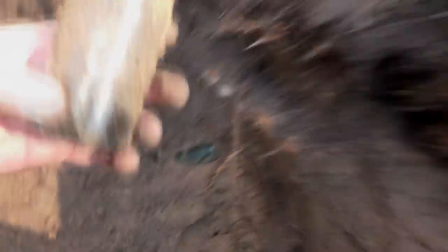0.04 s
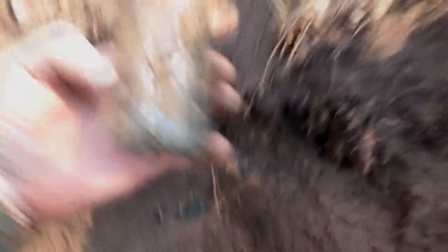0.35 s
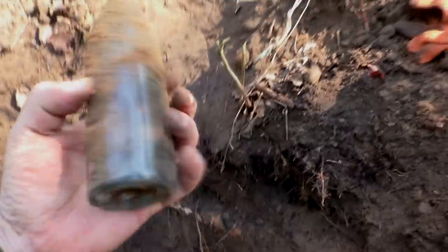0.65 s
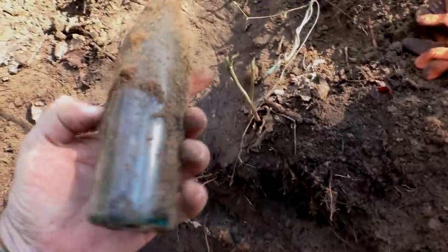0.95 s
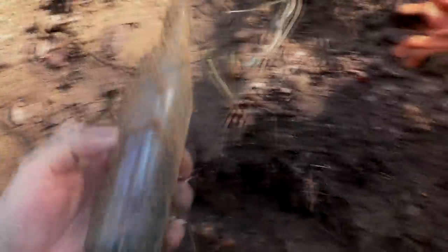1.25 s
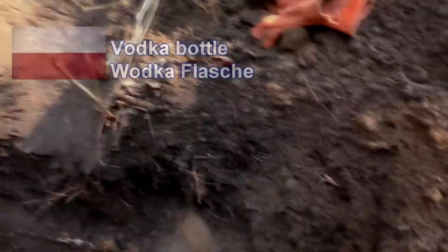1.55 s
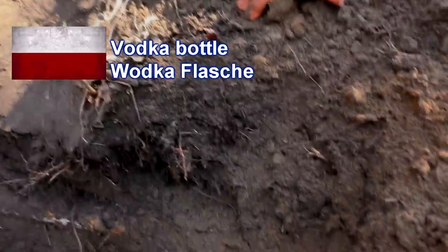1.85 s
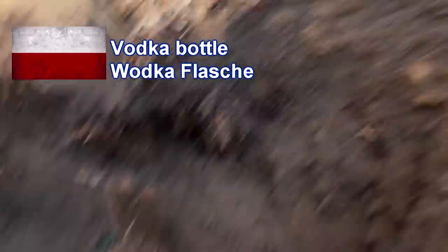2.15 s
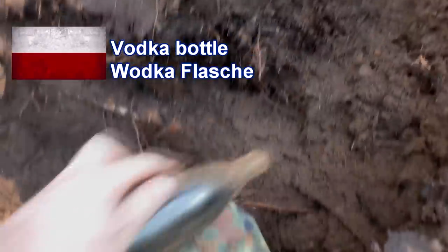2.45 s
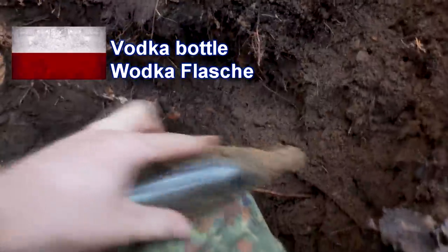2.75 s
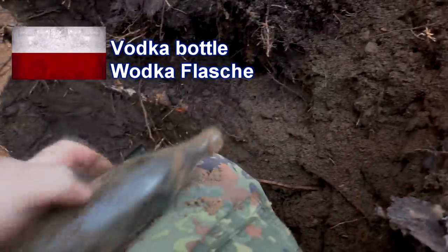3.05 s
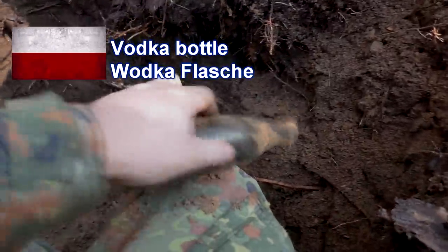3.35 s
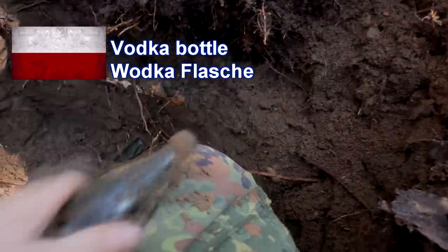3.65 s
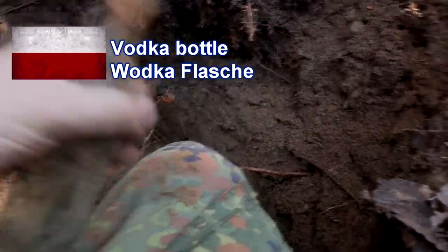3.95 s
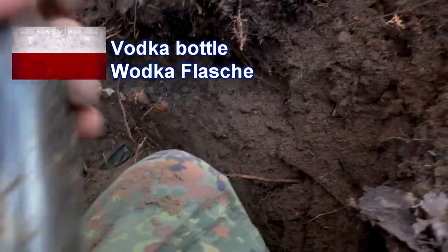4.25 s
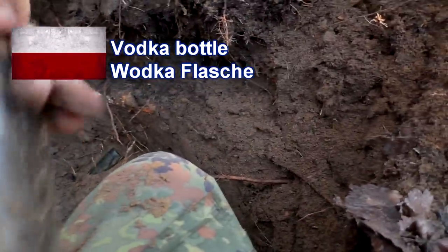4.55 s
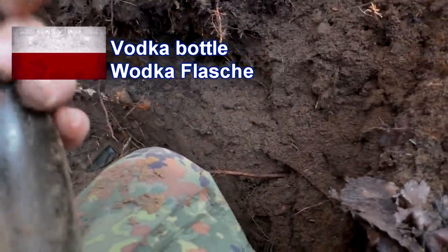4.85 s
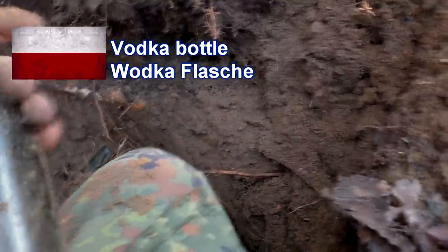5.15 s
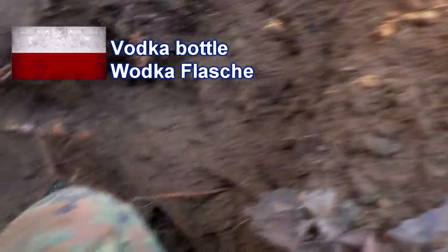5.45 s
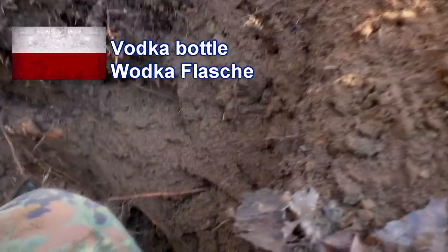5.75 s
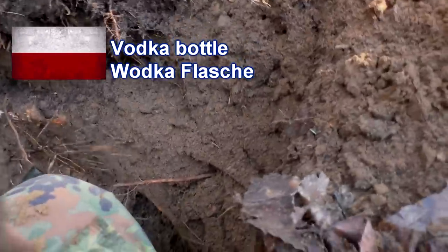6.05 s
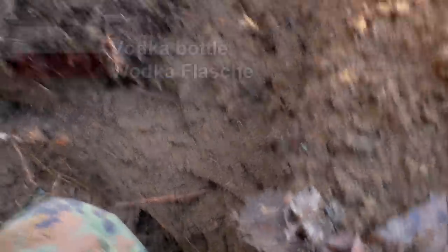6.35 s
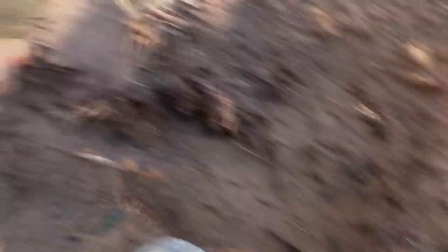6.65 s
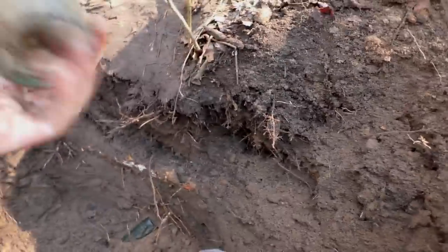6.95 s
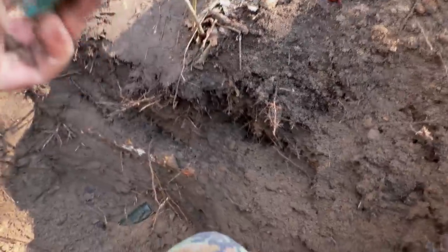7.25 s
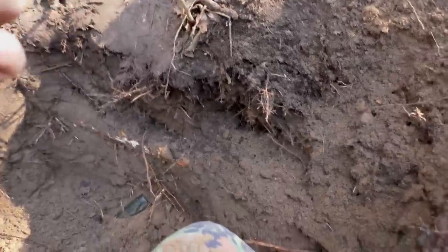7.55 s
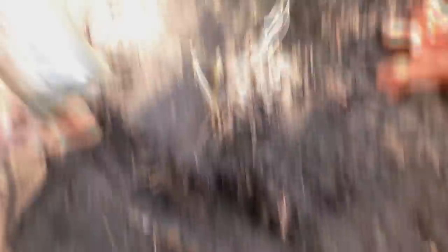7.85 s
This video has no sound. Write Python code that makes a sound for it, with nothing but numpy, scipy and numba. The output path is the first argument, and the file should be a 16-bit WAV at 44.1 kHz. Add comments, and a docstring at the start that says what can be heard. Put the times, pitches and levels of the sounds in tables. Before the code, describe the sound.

Close to the microphone, hands turn a dirt-crusted glass bottle and crack grit off it with tiny ticks. The bottle is wiped on a trouser knee in quick hissing, rasping strokes, then fingers rub off more soil, making the glass ring faintly. Soft hand bumps and a rustling sleeve go with the work. Behind, in a hushed wood, small birds whistle and a distant crow caws once.

```python
"""Cleaning a dug-up bottle

Close by, hands turn a glass bottle, crack off grit, wipe it on a trouser knee and rub off the soil.
Slipping grains hiss, rasp and ring the glass; hands bump it and a sleeve rustles.
Behind, in the hush of a wood, small birds whistle and a distant crow caws once."""
import sys
import numpy as np
from scipy import signal
from scipy.fft import rfft, irfft, next_fast_len
from scipy.io import wavfile
from scipy.ndimage import map_coordinates
from numba import njit

SR = 44100
rng = np.random.default_rng(int(sys.argv[2]) if len(sys.argv) > 2 else 0)


def persist_wave(psi):
    """Save psi, clipped to +-1, as 16-bit WAV."""
    counts = np.round(np.clip(psi, -1, 1) * 32767).astype(np.int16)
    wavfile.write(sys.argv[1], SR, np.atleast_2d(counts).T)


N = 353505

# strokes on the knee: start_s, length_s, fastest_frac, arch_db, cloth_hiss_db, palm_hiss_db, rasp_db
KNEE_WIPES = [(1.704, 0.35, 0.72, 7.5, -36.5, -23.5, -31), (2.118, 0.36, 0.82, 3.5, -30.5, -29.5, -30),
              (2.443, 0.25, 0.2, 6, -25.5, -29.5, -28), (2.746, 0.37, 0.52, 8.5, -21.5, -25, -28),
              (3.077, 0.34, 0.47, 9.5, -22.5, -30, -25.5), (3.419, 0.29, 0.55, 8, -22.5, -23.5, -27),
              (3.696, 0.27, 0.29, 20, -25.5, -24.5, -26.5), (3.956, 0.1, 0.15, 12, -31, -28, -32.5)]
# finger strokes on the glass: start_s, length_s, fastest_frac, hiss_db, rasp_db, ring_db
FINGER_RUBS = [(-.05, 0.37, 0.55, -43.5, -43.5, -65), (0.257, 0.28, 0.37, -39, -43.5, -42.5),
               (0.5, 0.1, 0.17, -35, -44, -31), (0.564, 0.26, 0.17, -47, -46.5, -43.5),
               (1.11, 0.36, 0.2, -50, -67, -48), (3.886, 0.12, 0.16, -30.5, -58, -30),
               (4.006, 0.22, 0.42, -32.5, -47, -53), (4.212, 0.19, 0.5, -26.5, -38.5, -39),
               (4.391, 0.27, 0.38, -30, -40, -47), (4.617, 0.16, 0.53, -36, -48.5, -65),
               (4.721, 0.16, 0.57, -33.5, -38, -48), (4.86, 0.28, 0.27, -37, -42, -58),
               (5.095, 0.12, 0.36, -38, -58, -37), (5.191, 0.33, 0.35, -36.5, -44, -43.5),
               (5.49, 0.22, 0.95, -38, -42.5, -48), (5.7, 0.14, 0.67, -29.5, -38, -37),
               (5.85, 0.18, 0.47, -22.5, -35, -34), (5.992, 0.16, 0.6, -25.5, -32, -66),
               (6.139, .16, 0.66, -28.5, -36.5, -40), (6.277, 0.19, 0.67, -40.5, -41.5, -53),
               (6.415, 0.24, 0.56, -31, -43.5, -43), (6.616, 0.18, 0.28, -38.5, -44.5, -52),
               (6.874, 0.12, 1, -35.5, -52, -49), (6.974, 0.23, 0.1, -39.5, -78, -46),
               (7.226, 0.16, 0.3, -37, -50.5, -54), (7.361, 0.23, 0.93, -38, -46.5, -51),
               (7.57, 0.15, 0, -38, -54, -49), (7.724, 0.33, 0.41, -40, -49.5, -43.5)]
# soil on cloth: freq_hz, level_db
CLOTH_SPECTRUM = [(4000, -53.5), (6800, -18), (8200, 1), (10300, 5), (12900, -7), (14200, -7),
                  (16000, -18.5)]
# soil under skin: freq_hz, level_db
FINGER_SPECTRUM = [(4500, -31), (6700, -11), (7600, -5), (8800, -8), (10200, -2.5), (11000, -3.5),
                   (11600, 0.5), (12700, -5), (13800, -2), (16000, -8.5)]
# slips through hand and bottle: freq_hz, level_db
RASP_SPECTRUM = [(30, -34), (200, -9.5), (380, -8), (750, -27), (1100, -6.5), (2000, -1), (3200, 5),
                 (3900, 4.5), (4700, 3.5), (6500, -1.5), (9000, -25)]
# cavity between hand and bottle, lower as the grip closes: time_s, resonance_hz, level_db
GRIP_HOLLOW = [(1.9, 2570, -15), (2.2, 2260, -3.5), (2.6, 3470, -24), (2.83, 2930, 3.5), (3.1, 3150, -36),
               (3.28, 2690, -3), (3.37, 1850, 6), (3.451, 3560, -18), (3.6, 2730, -6), (3.82, 2010, -2),
               (4, 2000, 3.5), (4.3, 1970, -21), (6.1, 1960, -4.5)]
# hand-damped bottle: freq_hz, width_hz, level_db
GLASS_MODES = [(3240, 80, 5.5), (4600, 130, -5), (7620, 220, -9)]
# grains cracking: start_s, ring_db, snap_db
GRIT_CRACKS = [(0.759, -28, -29), (0.7916, -12, -8.5), (0.8104, -21, -18), (.829, -15, -17),
               (0.951, -23, -20.5), (1.078, -18.5, -20), (1.2116, -30, -28), (1.227, -17.5, -16),
               (2.396, -21, -19), (2.933, -24, -12), (5.291, -40, -22), (5.32, -44, -20)]
# crusted glass: freq_hz, width_hz, level_db
CRUST_MODES = [(3180, 180, -0.5), (4260, 200, -7.5)]
# snapping grain: freq_hz, width_hz, level_db
SNAP_MODES = [(7380, 400, 0), (9940, 1800, -6)]
# crust under a finger: start_s, length_s, level_db, rasp_re_hiss_db
CRUST_SCRATCHES = [(0.53, 0.013, -19.5, -32), (0.547, 0.017, -27, -11), (1.681, 0.031, -28, 1.5),
                   (3.636, 0.027, -22, -13), (6.403, 0.026, -29.5, -5)]
# hand meeting bottle: start_s, peak_db, pitch_hz
HAND_BUMPS = [(0.164, -23.5, 410), (.343, -32, 376), (2.374, -28.5, 370), (2.665, -35.5, 380),
              (3.39, -28.5, 467), (3.391, -19, 1410), (3.655, -19, 368), (3.659, -30, 111),
              (6.248, -31, 255), (6.353, -25.5, 1290)]
# arm movements: start_s, length_s, fastest_frac, level_db
ARM_SHIFTS = [(-.1, 0.88, 0.28, -42), (1.23, 0.31, 0.34, -45.5), (2.319, 0.13, 0.65, -39.5),
              (3.205, 0.12, 0.3, -33), (3.576, 0.37, 0.63, -38.5), (5.22, 0.86, 0, -52),
              (6.052, 0.268, 0.8, -39.5), (6.586, 0.35, .25, -50), (7.73, 0.41, 0.33, -49.5)]
# sleeve and hands: freq_hz, level_db
RUSTLE_SPECTRUM = [(25, -21), (130, -6.5), (380, 2.5), (560, -4.5), (800, -6.5), (1200, 1), (2200, -3.5),
                   (9000, -28)]
# single bird notes: start_s, length_s, start_hz, end_hz, level_db
BIRD_CHIRPS = [(0.646, 0.089, 2190, 3370, -38.5), (.682, 0.04, 3770, 3920, -34),
               (0.858, 0.03, 3130, 3690, -33), (0.883, 0.12, 5250, 4700, -46),
               (0.987, 0.042, 3680, 2830, -39), (1.027, 0.0394, 3220, 3600, -33),
               (1.091, 0.16, 7270, 6840, -53), (4.676, 0.04, 5420, 5250, -33),
               (5.262, 0.05, 5400, 4830, -45), (5.373, .028, 5000, 4300, -41),
               (6.243, 0.085, 3310, 2390, -35.5), (7.25, 0.21, 1646, 1470, -52.5),
               (7.441, 0.14, 2460, 2262, -40.5), (7.635, 0.077, 3340, 2320, -34.5)]
# runs of falling notes: start_s, stop_s, spacing_s, start_hz, end_hz, first_db, step_db
BIRD_TRILLS = [(1.11, 1.6, .09, 3300, 2260, -39, -1), (6.169, 6.55, 0.11, 4150, 3110, -40.5, -0.2)]
# crow call: time_s, pitch_hz, level_db
CAW_CONTOUR = [(4.97, 413, -59), (5.007, 419.3, -39), (5.065, 392.3, -36.5), (5.101, 350, -40.5),
               (5.15, 347, -58)]
# crow formants: freq_hz, width_hz, level_db
THROAT_MODES = [(386, 35, 3), (744, 120, -4.5), (1820, 370, 6.5), (3580, 180, 4)]
# hush of the wood: freq_hz, level_db
AIR_SPECTRUM = [(25, -8), (100, -1.5), (400, -1), (750, -9), (1200, -0.5), (3200, -3), (6000, -18),
                (16000, -35)]
# far birdsong: time_s, level_db
FAR_CHORUS = [(.3, -52), (.8, -42.5), (1.6, -50), (6, -50.5), (6.4, -42), (7, -55.5)]
# width of near sounds: freq_hz, side_re_mid_db
SIDE_SPECTRUM = [(60, -5), (300, -6.5), (1500, -25.5), (4000, -7.5), (8000, -18)]
# channel balance of near sounds: freq_hz, left_re_right_db
BALANCE = [(100, 4.5), (250, 2), (600, -.5), (1400, 2.6), (2900, 2.4), (5500, -1.2), (8500, -.8),
           (13500, 3.6)]
# bottle moving left and partly back: time_s, left_re_right_db
BOTTLE_PAN = [(0, -2.8), (4.5, 0.6), (8, -1)]

RASP_EXPONENT = 0.72  # rasp and knee-wipe ring grow as this power of speed


def wiping(hiss, rasp):
    """Soil grinds between glass and cloth: fine hiss from speed, coarse rasp from pressure."""
    grit = friction(slips_per_s=15000, size_db=-1.5, clump_db=1.87)
    weave = friction(slips_per_s=3200, size_db=3.2, clump_db=1.25)
    return hiss * coloured(grit, CLOTH_SPECTRUM) + rasp * rasping(weave)


def wipe_levels(ring_re_rasp_db=-10):
    """Gains of the knee strokes: cloth hiss, palm hiss, rasp, and a ring that follows the rasp."""
    hiss, palm, rasp = np.zeros((3, N))
    for start_s, length_s, fastest_frac, arch_db, hiss_db, palm_db, rasp_db in KNEE_WIPES:
        speed = stroke(start_s, length_s, fastest_frac, arch_db, ease_s=0.096)
        hiss += amp(hiss_db) * speed
        palm += amp(palm_db) * speed
        rasp += amp(rasp_db) * speed ** RASP_EXPONENT
    return trickle(hiss), trickle(palm), trickle(rasp), amp(ring_re_rasp_db) * rasp


def rubbing(hiss, rasp, ring, grip_hiss_db=-61):
    """Skin drags fine soil over the bottle, whose wall rings along."""
    grit = friction(slips_per_s=9000, size_db=2.0, clump_db=1.62)
    skin = friction(slips_per_s=8000, size_db=-1.0, clump_db=1.53)
    soil_hiss = np.hypot(hiss, amp(grip_hiss_db)) * coloured(grit, FINGER_SPECTRUM)
    return soil_hiss + rasp * rasping(skin) + ring * glass(skin)


def rub_levels():
    """Gains of the finger strokes: hiss, rasp, ring."""
    hiss, rasp, ring = np.zeros((3, N))
    for start_s, length_s, fastest_frac, hiss_db, rasp_db, ring_db in FINGER_RUBS:
        speed = stroke(start_s, length_s, fastest_frac, arch_db=9.5, ease_s=0.055)
        hiss += amp(hiss_db) * speed
        rasp += amp(rasp_db) * speed ** RASP_EXPONENT
        ring += amp(ring_db) * speed
    return trickle(hiss), trickle(rasp), ring


def stroke(start_s, length_s, fastest_frac, arch_db, ease_s):
    """Speed of one movement: eases in, quickens by arch_db, slackens, stops."""
    t, speed = np.arange(int(length_s * SR)) / SR, np.zeros(N + SR)
    ends = np.sin(np.pi / 2 * np.clip(np.minimum(t, length_s - t) / ease_s, 0, 1))
    slack = np.interp(t / length_s, [0, np.clip(fastest_frac, .05, .95), 1], [1, 0, 1])
    add(speed, start_s + 1, ends * amp(-arch_db * slack))  # 1 s lead-in allows negative starts
    return speed[SR:]


def friction(slips_per_s, size_db, clump_db):
    """Tiny slips: random impulses of uneven size, bunched in clumps."""
    hits = (rng.random(N) < slips_per_s / SR) * rng.choice([-1, 1], N)
    sizes = amp(size_db * np.clip(rng.standard_normal(N), -3, 3))
    return hits * sizes * amp(clump_db * (wobble(45) + wobble(350)))


def trickle(level, tail_db=-14, decay_s=0.27):
    """Crumbs keep falling briefly after the hand has passed."""
    pole = np.exp(-1 / (decay_s * SR))
    tail = signal.lfilter([1 - pole], [1, -pole], level)
    return np.hypot(level, amp(tail_db) * tail)


def rasping(slips, hollow_q=2.35):
    """Slips heard through hand and bottle; the hollow of the grip adds a gliding resonance."""
    time_s, hz, db = np.transpose(GRIP_HOLLOW)
    t = np.arange(N) / SR
    gain = amp(np.interp(t, time_s, db))
    hollow = unit(moving_resonance(slips, np.interp(t, time_s, hz), hollow_q))
    return (coloured(slips, RASP_SPECTRUM) + gain * hollow) / (1 + gain / 2)


def glass(slips, bend_frac=0.016):
    """The bottle wall rings; shifting fingers bend its modes slightly."""
    bend = 1 + bend_frac * wobble(5)
    return unit(sum(amp(db) * moving_resonance(slips, hz * bend, hz / width_hz)
                    for hz, width_hz, db in GLASS_MODES))


def cracks(t60_s=0.013, highpass_hz=2500):
    """Grains snap and ring the crusted glass; too small to radiate bass."""
    t, out = np.arange(SR // 30) / SR, np.zeros(N)
    highpass = signal.butter(2, highpass_hz, "high", fs=SR, output="sos")
    for start_s, ring_db, snap_db in GRIT_CRACKS:
        burst = signal.sosfilt(highpass, rng.standard_normal(len(t)) * amp(-60 * t / t60_s))
        for modes, db in (CRUST_MODES, ring_db), (SNAP_MODES, snap_db):
            tick = resonate(burst, modes)
            add(out, start_s, amp(db) * tick / np.abs(tick).max())
    return out


def scratches(squeal_hz=11600, squeal_width_hz=1300):
    """Crust gives way in a dense run of slips that makes the glass squeal."""
    grit = friction(slips_per_s=9000, size_db=2.5, clump_db=1.8)
    squeal = resonate(grit, [(squeal_hz, squeal_width_hz, 0)])
    hiss = unit(coloured(grit, FINGER_SPECTRUM) + squeal)
    rasp = rasping(grit)
    t, out = np.arange(N) / SR, np.zeros(N)
    for start_s, length_s, db, rasp_db in CRUST_SCRATCHES:
        push = np.interp(t, start_s + length_s * np.array([0, .35, .65, 1.3]), [0, 1, 1, 0])
        out += amp(db) * push * (hiss + amp(rasp_db) * rasp)
    return out


def bumps(t60_cycles=7.1, puff_t60_s=0.033, puff_db=-14, attack_s=0.00071):
    """Soft contact of hand and bottle: a push of a few cycles and a dull puff."""
    t, out = np.arange(SR // 10) / SR, np.zeros(N)
    for start_s, db, hz in HAND_BUMPS:
        push = np.sin(2 * np.pi * hz * t) * amp(-60 * t * hz / t60_cycles)
        noise = coloured(rng.standard_normal(len(t)), RUSTLE_SPECTRUM)
        puff = noise * amp(puff_db - 60 * t / puff_t60_s)
        knock = (push + puff) * (1 - np.exp(-t / attack_s))
        add(out, start_s, amp(db) * knock / np.abs(knock).max())
    return out


def sleeve(pressure, follow_db=-16.5):
    """Cloth and hands shift with a low, lumpy rustle on each stroke and arm movement."""
    arm = sum(amp(db) * stroke(start_s, length_s, fastest_frac, arch_db=8, ease_s=0.049)
              for start_s, length_s, fastest_frac, db in ARM_SHIFTS)
    level = np.hypot(arm, amp(follow_db) * pressure)
    return level * coloured(friction(slips_per_s=1500, size_db=4, clump_db=1.5), RUSTLE_SPECTRUM)


def spread(x, t60_s=0.049, shift_hz=90):
    """Mono to stereo: shifting scatter off hands and ground gives a little width."""
    t = np.arange(SR // 20) / SR
    paths = rng.standard_normal((4, len(t))) * amp(-60 * t / t60_s)
    paths /= np.linalg.norm(paths)
    side = sum(signal.fftconvolve(x * unit(wobble(shift_hz)), path)[:N] for path in paths)
    side = filtered(side, lambda hz: amp(along(SIDE_SPECTRUM, hz)))
    return filtered(np.array([x + side, x - side]), lambda hz: pan(along(BALANCE, hz)))


def placed(pair):
    """The bottle is slightly louder in the nearer channel."""
    return pair * pan(np.interp(np.arange(N) / SR, *np.transpose(BOTTLE_PAN)))


def songbirds(waver_frac=0.014, flutter_db=4.0, settle_exponent=2.4, trill_note_s=0.033):
    """Gliding whistles: single notes settle on their end pitch, trill notes fall linearly."""
    notes = [(*chirp, settle_exponent) for chirp in BIRD_CHIRPS]
    for first_s, stop_s, spacing_s, start_hz, end_hz, db, step_db in BIRD_TRILLS:
        for k, start_s in enumerate(np.arange(first_s, stop_s, spacing_s)):
            notes.append((start_s, trill_note_s, start_hz, end_hz, db + k * step_db, 1))
    out, drift = np.zeros(N), 1 + waver_frac * wobble(300)
    for start_s, length_s, start_hz, end_hz, db, exponent in notes:
        progress = np.linspace(0, 1, int(length_s * SR))
        hz = end_hz + (start_hz - end_hz) * (1 - progress) ** exponent
        phase = 2 * np.pi * np.cumsum(hz * drift[int(start_s * SR):][:len(hz)]) / SR
        swell = np.sqrt(2 * np.abs(np.sin(np.pi * np.sqrt(progress))))  # quick rise, slow fade
        add(out, start_s, amp(db) * swell * np.sin(phase))
    return out * amp(flutter_db * wobble(420))


def crow(jitter_frac=0.016, roughness=0.69):
    """A hoarse caw: uneven pulses and gated noise through the throat."""
    time_s, pitch_hz, db = np.transpose(CAW_CONTOUR)
    t = np.arange(N) / SR
    cycles = np.cumsum(np.interp(t, time_s, pitch_hz) * (1 + jitter_frac * wobble(400))) / SR
    pulses = unit(np.diff(np.floor(cycles), prepend=0))
    rasp = unit(rng.standard_normal(N) * np.cos(np.pi * cycles) ** 2)
    level = amp(np.interp(t, time_s, db, left=-120, right=-120))
    return level * resonate(pulses + roughness * rasp, THROAT_MODES)


def trees(x, t60_s, wet_db, lowpass_hz=4500):
    """Trunks scatter far calls into a stereo tail; leaves absorb its treble."""
    t = np.arange(SR) / SR
    tail = rng.standard_normal((2, SR)) * amp(-60 * t / t60_s)
    echo = signal.fftconvolve(x[None], tail / np.linalg.norm(tail[0]), axes=1)[:, :N]
    echo = filtered(echo, lambda hz: 1 / np.sqrt(1 + (hz / lowpass_hz) ** 10))
    return (x + amp(wet_db) * echo) / np.hypot(1, amp(wet_db))


def air(hush_db=-50, song_hz=3190, song_width_hz=680):
    """Steady hush of the wood, with a blur of far birdsong."""
    hush = amp(hush_db + 0.89 * wobble(3.07)) * coloured(rng.standard_normal(N), AIR_SPECTRUM)
    song_db = np.interp(np.arange(N) / SR, *np.transpose(FAR_CHORUS), left=-120, right=-120)
    flutter_db = 2.8 * wobble(25)
    song = resonate(rng.standard_normal(N), [(song_hz, song_width_hz, 0)])
    return hush + amp(song_db + flutter_db) * song


def amp(db):
    return 10 ** (np.asarray(db) / 20)


def pan(left_re_right_db):
    return amp(np.outer([.5, -.5], left_re_right_db))


def unit(x):
    """x at rms 1."""
    return x / np.sqrt(np.mean(x ** 2) + 1e-20)


def along(points, hz):
    """Interpolate (freq_hz, value) points on a log axis."""
    freq_hz, values = np.transpose(points)
    return np.interp(np.log(hz + 1), np.log(freq_hz + 1), values)


def wobble(rate_hz):
    """Smooth random curve, rate_hz knots a second."""
    knots = rng.standard_normal(int(N * rate_hz / SR) + 4)
    return map_coordinates(knots, [np.arange(N) * rate_hz / SR])


def filtered(x, response):
    """x through a complex frequency response."""
    n = x.shape[-1]
    size = next_fast_len(n + 8192)
    return irfft(rfft(x, size) * response(np.fft.rfftfreq(size, 1 / SR)), size)[..., :n]


def coloured(x, spectrum):
    """x shaped by a spectrum, at rms 1."""
    return unit(filtered(x, lambda hz: amp(along(spectrum, hz))))


def resonate(x, modes):
    """x through (freq_hz, width_hz, level_db) resonances, at rms 1."""
    return unit(filtered(x, lambda f: sum(
        amp(db) * 1j * f * width_hz / (hz * hz - f * f + 1j * f * width_hz)
        for hz, width_hz, db in modes)))


@njit
def moving_resonance(x, hz, q):
    """State-variable band-pass, tuned per sample."""
    out, low, band = np.zeros(len(x)), 0., 0.
    for i in range(len(x)):
        tuning = 2 * np.sin(np.pi * hz[i] / SR)
        low += tuning * band
        band += tuning * (x[i] - low - band / q)
        out[i] = band / q
    return out


def add(track, start_s, sound):
    part = track[max(round(start_s * SR), 0):][:len(sound)]
    part += sound[:len(part)]


def scene(air_side_db=-5):
    """Work on the bottle close by, birds among the trees behind."""
    wipe_hiss, palm_hiss, wipe_rasp, wipe_ring = wipe_levels()
    rub_hiss, rub_rasp, rub_ring = rub_levels()
    near = rubbing(np.hypot(rub_hiss, palm_hiss), rub_rasp, rub_ring + wipe_ring)
    near += wiping(wipe_hiss, wipe_rasp)
    near += sleeve(wipe_rasp + rub_rasp) + scratches() + cracks() + bumps()
    wood = air() + amp(air_side_db) * np.outer([1, -1], air())  # independent mid and side
    bottle = placed(spread(near))
    birds = trees(songbirds(), t60_s=1.0, wet_db=-0.5)
    caw = trees(crow(), t60_s=0.13, wet_db=-13)
    return bottle + wood + birds + caw


def record(dry, top_hz=15900):
    """Brick-wall low-pass."""
    return filtered(dry, lambda hz: hz < top_hz)


dry = scene()
out = record(dry)
persist_wave(out)
```